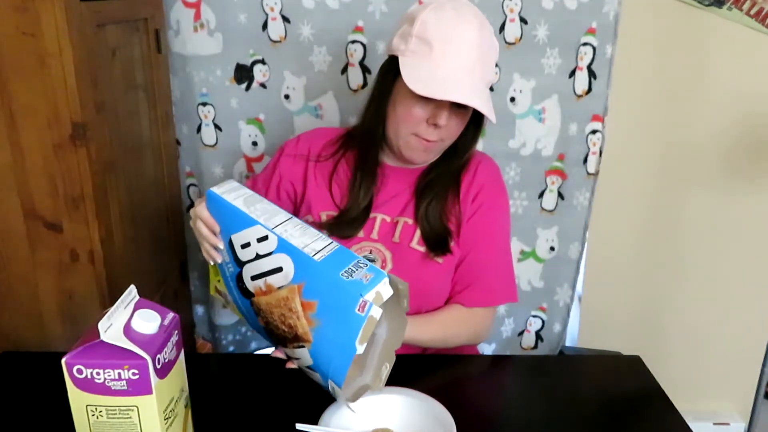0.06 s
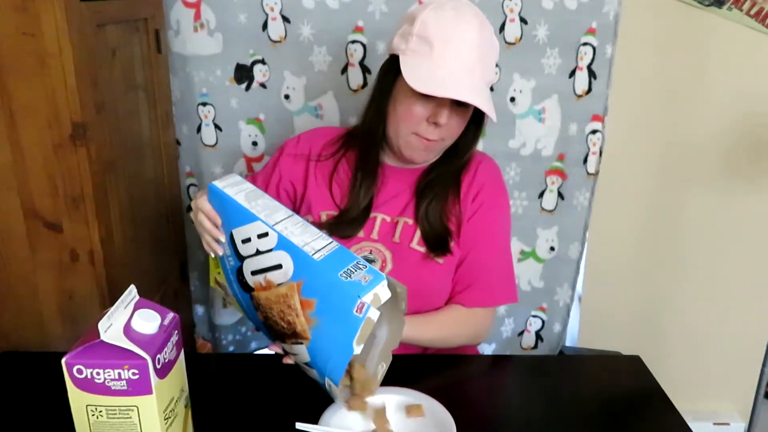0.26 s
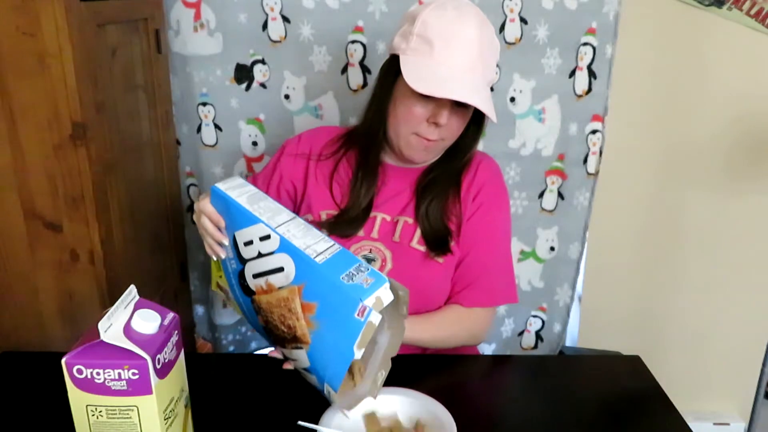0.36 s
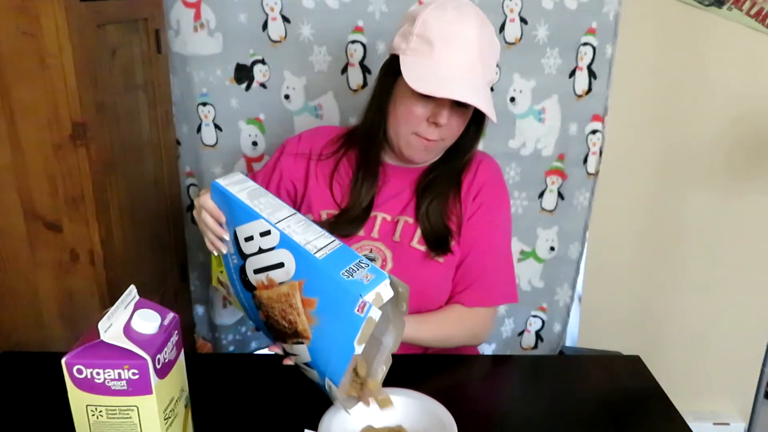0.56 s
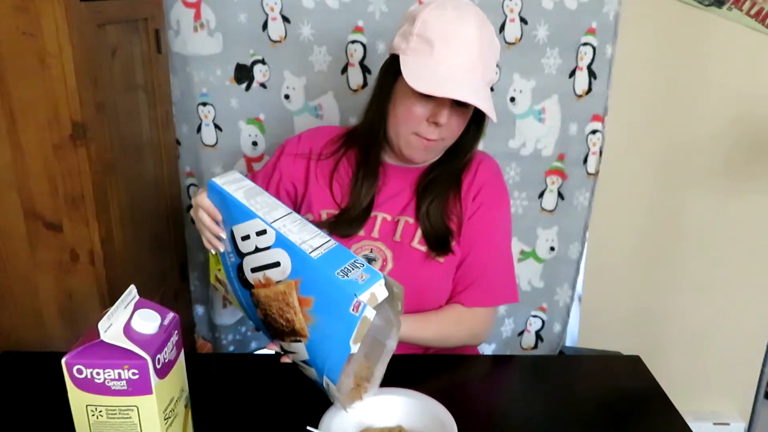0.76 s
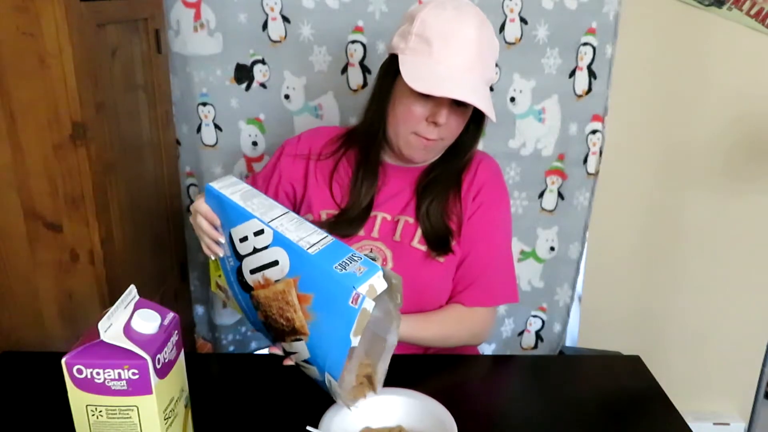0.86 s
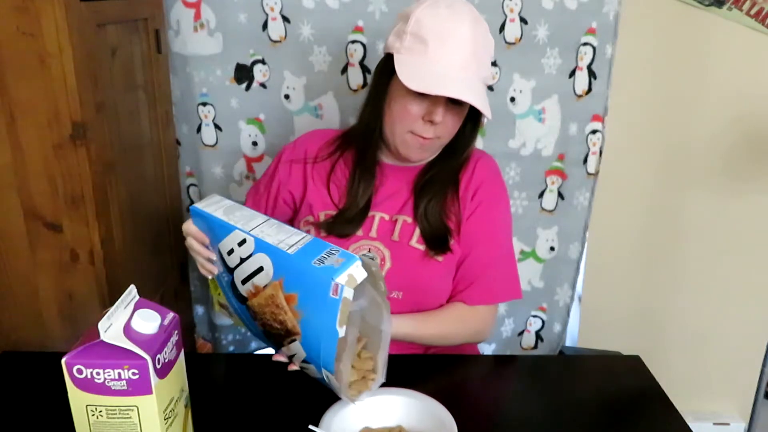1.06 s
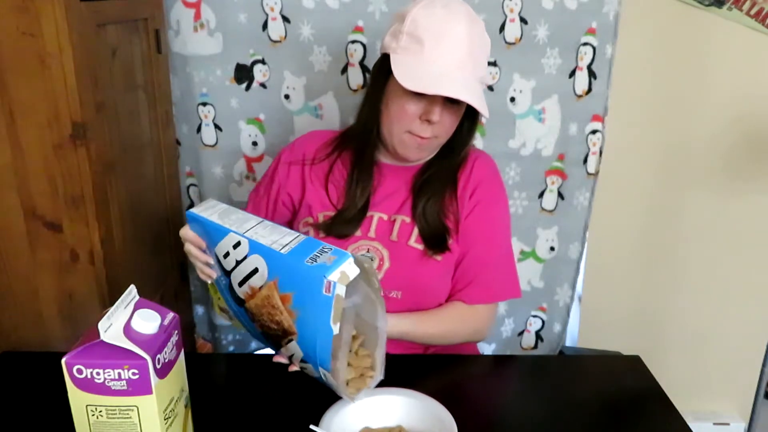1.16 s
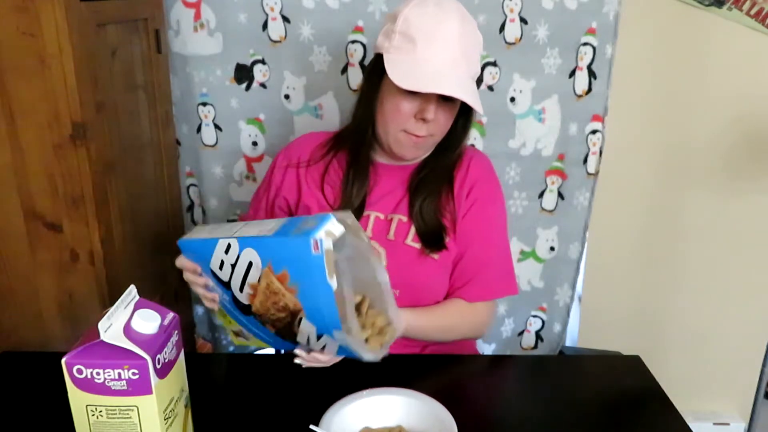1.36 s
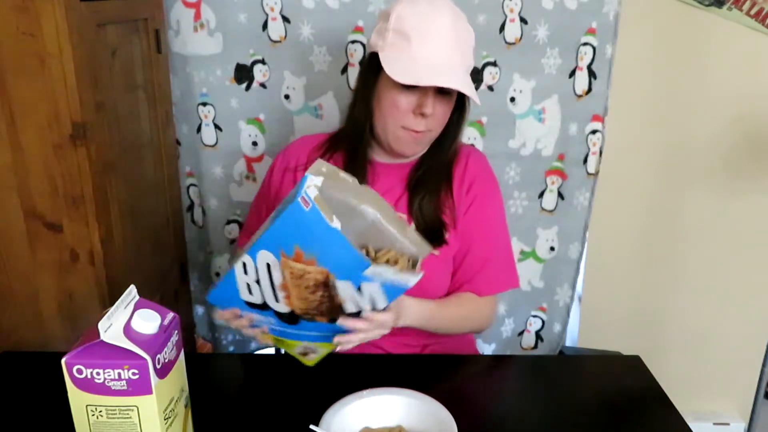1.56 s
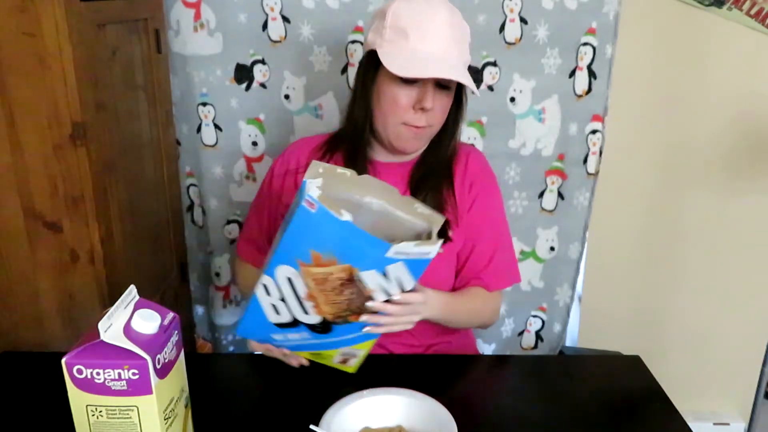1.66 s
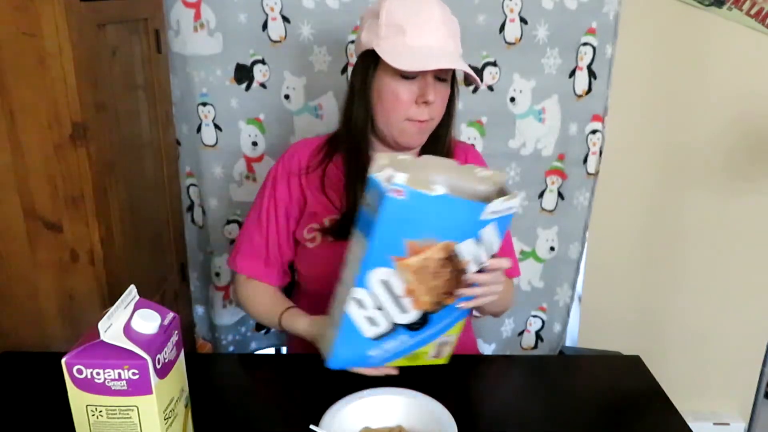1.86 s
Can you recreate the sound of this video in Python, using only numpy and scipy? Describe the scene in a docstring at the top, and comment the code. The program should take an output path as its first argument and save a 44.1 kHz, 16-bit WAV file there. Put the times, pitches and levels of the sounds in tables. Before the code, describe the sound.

Dry cereal pieces rattle from a cardboard box into a ceramic bowl in several quick spurts

```python
"""Dry cereal knocks and rings into a ceramic bowl in several spurts, each piece trailed by a shower of bounces.
The rest rustles in the cardboard box, swelling again late as it is tipped back upright; crumbs snap,
a thin high tone comes and goes, air and a low rumble lie faintly behind. Knocks and rings are decaying sines;
cracks, whistle, air and rumble are filtered noise; bounces and scrapes are random impacts on resonances.
A small room adds a diffuse tail; a phone dulls the sound and rounds its peaks."""
import sys
import numpy as np
from scipy import signal
from scipy.fft import rfft, irfft
from scipy.io import wavfile

SR = 44100
rng = np.random.default_rng(int(sys.argv[2]) if len(sys.argv) > 2 else 0)


def to_wav(sig):
    """Store sig (one row per channel, or 1-D mono) as 16-bit WAV at the path in sys.argv[1].

    Samples outside -1..1 are clipped; the rate is SR.
    """
    pcm = np.clip(np.atleast_2d(sig), -1, 1) * 32767
    pcm = np.round(pcm).astype(np.int16)
    wavfile.write(sys.argv[1], SR, pcm.T)  # frames by channels


N = 83790


def undb(db):
    """Amplitude factor of a level in dB."""
    return 10 ** (np.asarray(db) / 20)


def read(table, at):
    """Straight-line interpolation of a two-column table."""
    return np.interp(at, *np.array(table, float).T)


def unit(x):
    """Scales to an RMS of 1."""
    return x / np.sqrt(np.mean(x ** 2))


def fade(t, t60):
    """Exponential decay by 60 dB in t60 seconds, 2 ms at least."""
    return np.exp(-np.log(1000) * t / np.maximum(t60, .002))


def sine(hz, t):
    """Sine from zero phase at t = 0."""
    return np.sin(2 * np.pi * hz * t)


def lowpass(x, order, hz):
    """Butterworth low-pass."""
    return signal.lfilter(*signal.butter(order, hz, fs=SR), x)


def bandpass(x, order, low_hz, high_hz):
    """Butterworth band-pass."""
    return signal.lfilter(*signal.butter(order, [low_hz, high_hz], "band", fs=SR), x)


def colour(x, table):
    """Filters by (frequency [Hz], gain [dB]) points, joined over log frequency."""
    hz, db = np.array(table, float).T
    f = np.maximum(np.fft.rfftfreq(len(x), 1 / SR), 1)
    gain = undb(np.interp(np.log(f), np.log(hz), db))
    return irfft(rfft(x) * gain, len(x))


def grains(table, per_s, scatter_db, q):
    """Random tiny impacts; each rings about a quarter of a ladder, the high ones kept from getting too short."""
    hits = rng.random(N) < per_s / SR
    size = hits * undb(scatter_db * np.minimum(rng.exponential(size=N), 3))
    ladder_hz = np.r_[100 * 2 ** np.arange(0, 5, 1 / 4), np.arange(3200, 16000, 600)]
    out = 0
    for hz in ladder_hz:
        width_hz = min(hz / q, 700.)
        b, a = signal.iirpeak(hz, hz / width_hz, SR)
        chosen = rng.random(N) < .25
        drive = size * chosen * rng.standard_normal(N)
        out = out + signal.lfilter(b, a, signal.lfilter(b, a, drive))
    return unit(colour(out, table))


def add(out, s, x):
    """Adds x into out from time s, cut at the end."""
    i = int(s * SR)
    out[i:i + len(x)] += x[:N - i]


def air():
    """Faint steady room air: coloured noise."""
    # (frequency [Hz], gain [dB])
    air_colour = [(25, -42), (108, 1), (180, 3), (354, -0.5), (545, -5), (1650, -28.5), (3520, -24),
                  (5280, -22), (13200, -36.5), (16000, -85)]
    level_db = -47.5
    return undb(level_db) * unit(colour(rng.standard_normal(N), air_colour))


def port_noise():
    """Steady microphone noise, for opposite signs in the two ports."""
    # (frequency [Hz], gain [dB])
    noise_colour = [(100, 0.5), (500, 8), (3000, -3), (14000, -11.5)]
    level_db = -54.5
    return undb(level_db) * unit(colour(rng.standard_normal(N), noise_colour))


def rumble(t):
    """Low band of noise that swells and fades."""
    # (time [s], level [dB])
    swell = [(0.0, -72), (0.036, -56.5), (0.808, -60), (1.492, -43.5), (1.56, -61), (1.846, -49),
             (1.9, -60)]
    top_hz = 89
    low = bandpass(rng.standard_normal(N), 2, top_hz / 4, top_hz)
    return undb(read(swell, t)) * unit(low)


def whistle(t):
    """Thin high tone that comes and goes: noise through a narrow resonance."""
    # (time [s], level [dB])
    swell = [(1.222, -87), (1.232, -52), (1.275, -70), (1.288, -44.5), (1.33, -59), (1.362, -65),
             (1.375, -91)]
    whistle_hz, q = 5340, 150.
    b, a = signal.iirpeak(whistle_hz, q, SR)
    return undb(read(swell, t)) * unit(signal.lfilter(b, a, rng.standard_normal(N)))


def ticks():
    """Crumbs snap: sines that die within milliseconds."""
    # (time [s], level [dB], pitch [Hz])
    snaps = [(.306, -32, 9200), (0.545, -22, 5300), (0.746, -24, 8350), (1.176, -43, 9600),
             (1.372, -25, 1730), (1.385, -39, 9070), (1.843, -35.5, 4960)]
    t60_s = 0.0049
    out, t = np.zeros(N), np.arange(SR // 20) / SR
    for s, db, hz in snaps:
        add(out, s, undb(db) * sine(hz, t) * fade(t, t60_s))
    return out


def box(t):
    """Pieces scrape along the liner as dense grains; the hollow cardboard booms now and then."""
    # (time [s], level [dB])
    slide = [(0, -39), (.06, -41.5), (.1, -48), (.14, -35), (.19, -39.5), (.235, -50), (.5, -31.5),
             (.64, -34.5), (.73, -33.5), (.78, -34), (.82, -43), (1.0, -46.5), (1.22, -50.5), (1.31, -50.5),
             (1.365, -44), (1.38, -42.5), (1.43, -50.5), (1.5, -43), (1.56, -36), (1.64, -32), (1.68, -33),
             (1.72, -32), (1.77, -37), (1.82, -34), (1.9, -41)]
    # scrapes: (frequency [Hz], gain [dB])
    scrape_colour = [(47, -42), (80, -8), (222, -1), (422, -1), (575, -6), (877, -3), (1560, -5),
                     (2780, -9.5), (4230, -22.5), (9400, -25), (16000, -36)]
    # hollow bumps: (time [s], level [dB], pitch [Hz])
    bumps = [(.002, -30.5, 243.4), (0.173, -35, 218), (1.661, -37, 171), (1.77, -39.5, 226)]
    scrapes_per_s, scatter_db, bump_t60_s = 3200, 3, 0.32
    out = undb(read(slide, t)) * grains(scrape_colour, scrapes_per_s, scatter_db, q=3.44)
    for s, db, hz in bumps:
        add(out, s, undb(db) * sine(hz, t) * fade(t, bump_t60_s))
    return out


def bowl_ring(s, t, ring_db, tilt_db):
    """Ceramic modes, damped faster as the heap of cereal grows; each landing excites them a little differently."""
    # (mode [Hz], level [dB], t60 of the empty bowl [s])
    modes = [(2616, 0, 0.23), (2912, -4.5, 0.45), (3757, -6, 0.38), (5584, -11, 0.43), (8300, -2, 0.098),
             (9880, -12.5, 0.093), (11750, -13, 0.11)]
    scatter_db, fill_s = 2, .35
    hz, db, t60 = np.array(modes).T[:, :, None]
    scatter = scatter_db * rng.standard_normal(hz.shape)
    gain = undb(db + ring_db + tilt_db * np.log2(hz / 4000) + scatter)
    damped_t60 = t60 * np.exp(-s / fill_s)
    return (gain * sine(hz, s + t) * fade(t, damped_t60)).sum(axis=0)


def hollow(t):
    """Two low notes of the bowl's hollow, answered by the table top."""
    hollow_hz, hollow_t60_s = (548, 633.5), 0.033
    table_hz, table_t60_s, table_db = 120, 0.11, -25
    bowl = sum(sine(hz, t) for hz in hollow_hz) * fade(t, hollow_t60_s)
    return bowl + undb(table_db) * sine(table_hz, t) * fade(t, table_t60_s)


def landings():
    """Each piece knocks, thuds, cracks and rings the bowl; a shower of bounces dies away after it."""
    # (time [s], level [dB], knock [Hz], thud [Hz], then levels re the piece: thud [dB], crack [dB],
    #  bowl ring [dB], ring tilt [dB/octave], hollow [dB], bounces [dB])
    pieces = [(0.244, -15, 2430, 1260, -20, 0, -35, 0, -17, -2.5),
              (0.2478, -1.5, 1851, 1160, -5.5, -13.5, -35.5, -7, -7.5, -16),
              (0.347, -5.5, 2137, 942, -7, -9.5, -6, 2.2, -11.5, -10.5),
              (0.364, -10, 2040, 940, -4, -8, -30, -4, -30, -8.5),
              (0.376, -10.5, 2050, 933, -3, -19, -50, -4, -16, -12),
              (0.398, -25, 1910, 1170, -14, -21, -4.5, 0, -1.5, 3.5),
              (0.42, -11, 1136, 975, -1.5, -40, -49, -7, -5, -22),
              (0.426, -6.5, 2000, 940, -24, -35, -17, -19.5, -24, -8.5),
              (0.436, -4.5, 1960, 1198, -8.5, -35.5, -51, -23, -39, -12),
              (0.462, -7.5, 1917, 1049, -5.5, -15, -20, 11, -12, -14.5),
              (0.54, -16.5, 2074, 1040, -12, -22, -43, 0, -15, -6),
              (0.547, -12.5, 2175, 1084, 0, -21, -21.5, 7, -4.5, -8),
              (0.573, -19, 1187, 1230, -19, -34.5, -39, -9, -2.5, -17),
              (0.659, -14.5, 2007, 1060, -30, -41, -31, -9, -22, -15.5),
              (0.682, -11, 1740, 807, -8, -26, -37, 11, -8, -11),
              (0.7, -7.5, 1825, 891, -11, -40, -30, 11, -41, -13.5),
              (0.756, -18, 1720, 1200, -15, -26, -10.5, 3, -19, -8),
              (0.834, -29.5, 1690, 790, -7, -17.5, -18, 2, -11, -4.5),
              (0.904, -7, 2208, 1060, -53, -24, -24, 15, -42, -15.5),
              (1.064, -13.5, 1740, 845, -11.5, -44, -26, 11, -24, -11.5),
              (1.082, -20.5, 1777, 892, 1.5, -31, -26, 12, -6.5, -15),
              (1.114, -27, 2175, 1000, -30, -35, -17, 7, -7.5, -11.5),
              (1.175, -26.5, 2200, 1400, -9.5, -26, -33, 24, -12.5, -21)]
    # bounces: (frequency [Hz], gain [dB])
    bounce_colour = [(150, -37), (286, -6), (745, -13.5), (1040, -2.5), (1480, -6), (1980, -1), (3840, -21),
                     (4320, -25.5), (8560, -31), (16000, -42.5)]
    knock_db, knock_t60_s, thud_t60_s, crack_t60_s = -7.5, 0.068, 0.047, 0.02
    rough_depth, rough_hz = .4, 180
    onset_t60_s, shower_onset_t60_s, shower_t60_s = 0.0076, 0.0042, 0.22
    bounces_per_s, bounce_scatter_db = 2200, 3

    out, shower_power, t = np.zeros(N), np.zeros(N), np.arange(SR // 2) / SR
    noise = rng.standard_normal((len(pieces), len(t)))
    cracks = bandpass(noise, 1, 3000, 11000)
    flutter = lowpass(rng.standard_normal(noise.shape), 2, rough_hz)
    roughness = 1 + rough_depth * unit(flutter)
    for piece, crack, rough in zip(pieces, cracks, roughness):
        s, level_db, knock_hz, thud_hz, thud_db, crack_db, ring_db, tilt_db, hollow_db, shower_db = piece
        tones = bowl_ring(s, t, ring_db, tilt_db)
        tones += undb(knock_db) * sine(knock_hz, t) * fade(t, knock_t60_s)
        tones += undb(thud_db) * sine(thud_hz, t) * fade(t, thud_t60_s)
        x = rough * tones
        x += undb(hollow_db) * hollow(t)
        x += undb(crack_db) * crack * fade(t, crack_t60_s)
        add(out, s, undb(level_db) * x * (1 - fade(t, onset_t60_s)))
        shower = fade(t, shower_t60_s) * (1 - fade(t, shower_onset_t60_s))
        add(shower_power, s, (undb(level_db + shower_db) * shower) ** 2)
    bounces = grains(bounce_colour, bounces_per_s, bounce_scatter_db, q=4.47)
    return out + np.sqrt(shower_power) * bounces


def room(x, t60_s):
    """Diffuse tail of decaying noise; the treble lasts treble_t60_s at most."""
    treble_t60_s = 0.21
    t = np.arange(SR // 2) / SR
    noise = rng.standard_normal(len(t))
    low = lowpass(noise, 1, 2500)
    tail = low * fade(t, t60_s) + (noise - low) * fade(t, min(t60_s, treble_t60_s))
    tail *= 1 - fade(t, 0.022)  # soft onset
    return signal.fftconvolve(x, tail / np.sqrt(np.sum(tail ** 2)))[:N]


def scene():
    """Sources and room in the middle; a short diffuse tail and port noise set the two channels apart."""
    # side tail: (frequency [Hz], gain [dB])
    width = [(60, -48), (200, -36), (380, -27), (700, -30.5), (2380, -21.5), (4400, -8.5), (8120, -14),
             (15000, 4.5)]
    room_t60_s, room_db, ports_t60_s = 0.26, -8.5, 0.06
    t = np.arange(N) / SR
    near = whistle(t) + ticks() + box(t) + landings()
    mid = air() + rumble(t) + near + undb(room_db) * room(near, room_t60_s)
    side = colour(room(near, ports_t60_s), width) + port_noise()
    return np.array([mid + side, mid - side])


def record(dry):
    """The phone dulls the treble and rounds the loudest peaks; nothing sounds above 16 kHz."""
    dull_hz, top_hz = 13500, 16000
    rounded = np.tanh(lowpass(dry, 1, dull_hz))
    steep_lowpass = signal.ellip(12, .2, 90, top_hz, fs=SR, output="sos")
    return signal.sosfilt(steep_lowpass, rounded)


dry = scene()
out = record(dry)
to_wav(out)
```